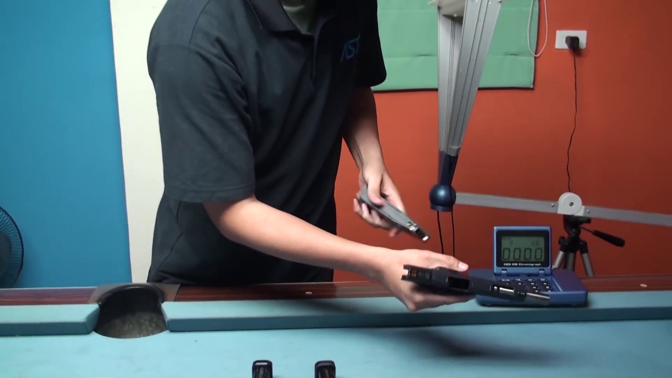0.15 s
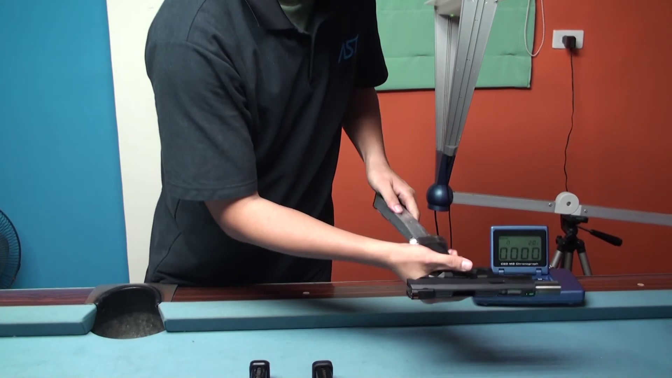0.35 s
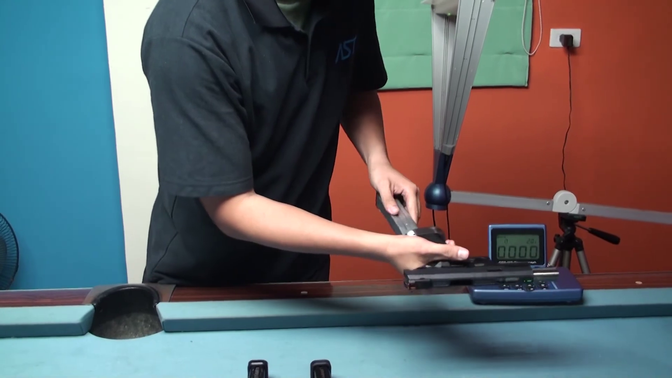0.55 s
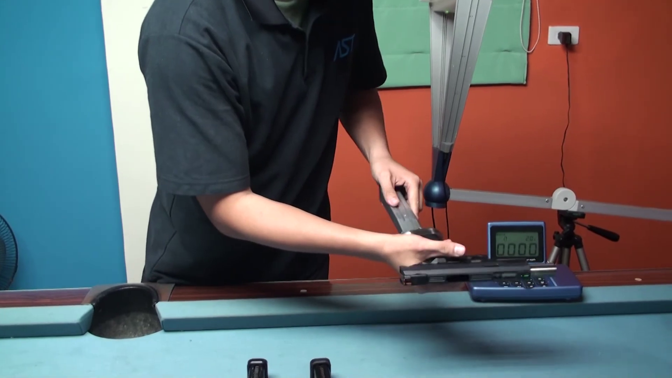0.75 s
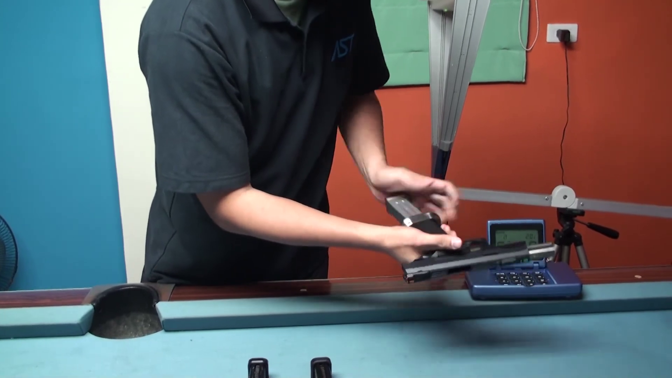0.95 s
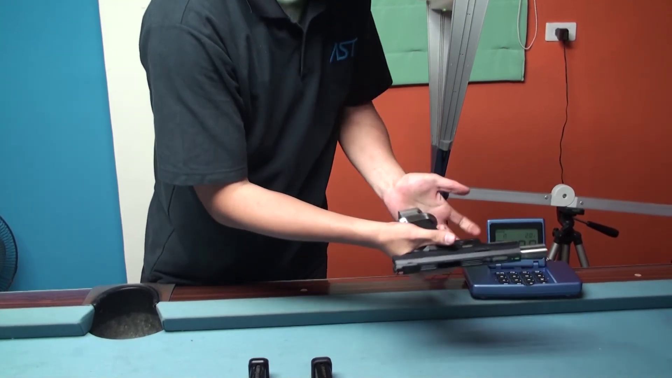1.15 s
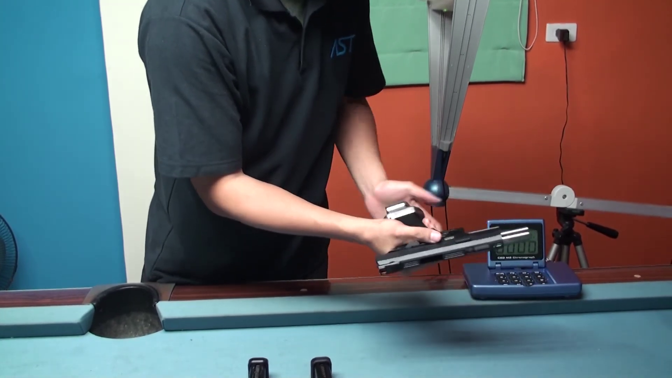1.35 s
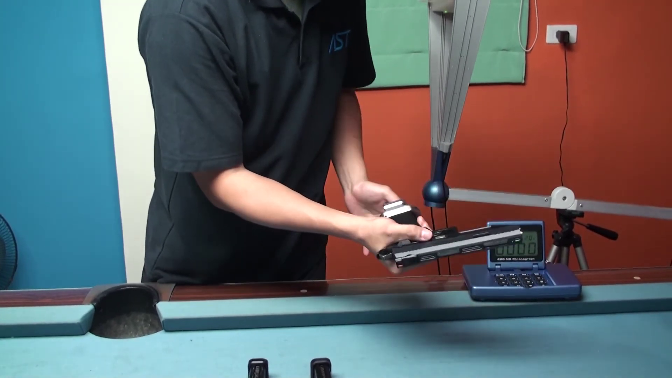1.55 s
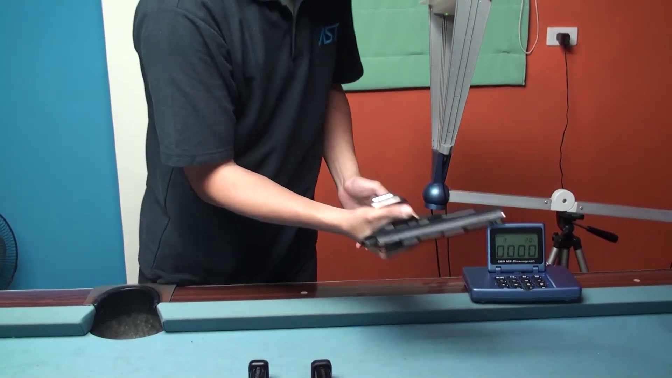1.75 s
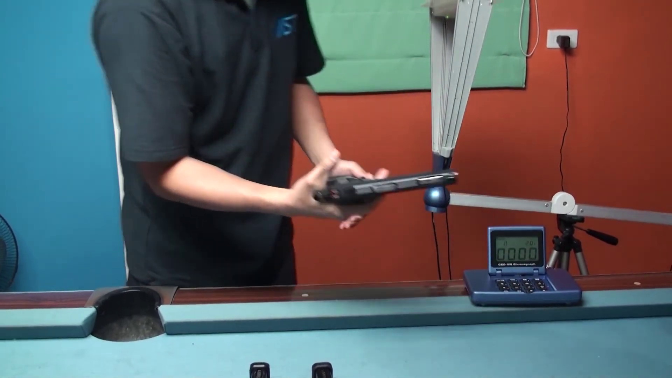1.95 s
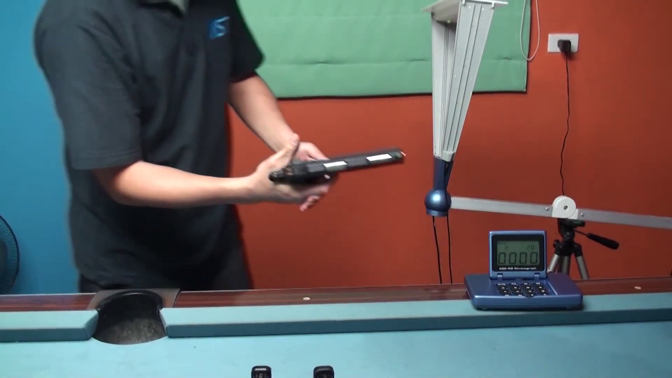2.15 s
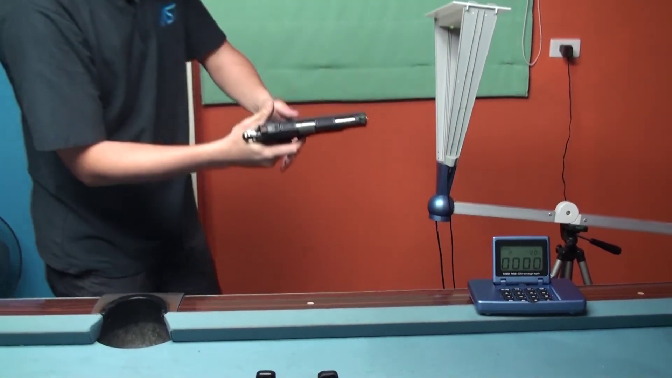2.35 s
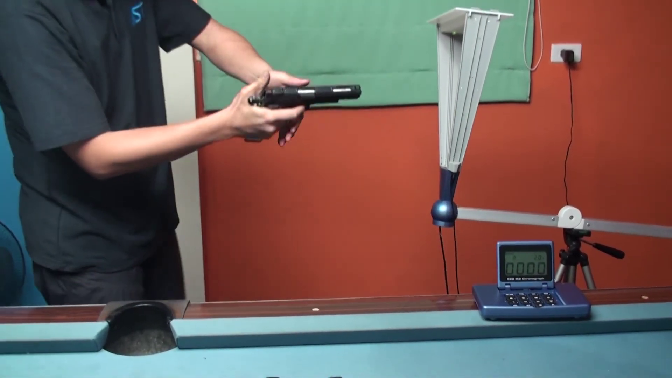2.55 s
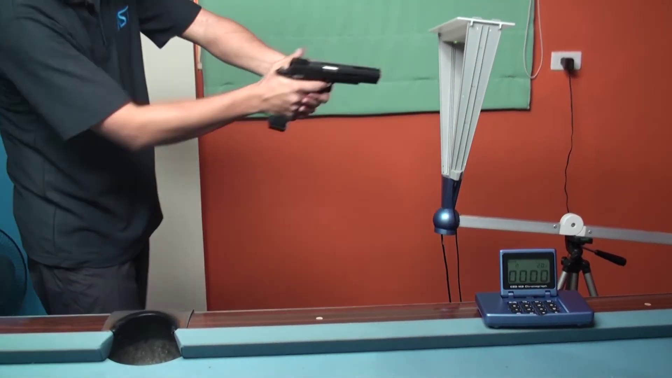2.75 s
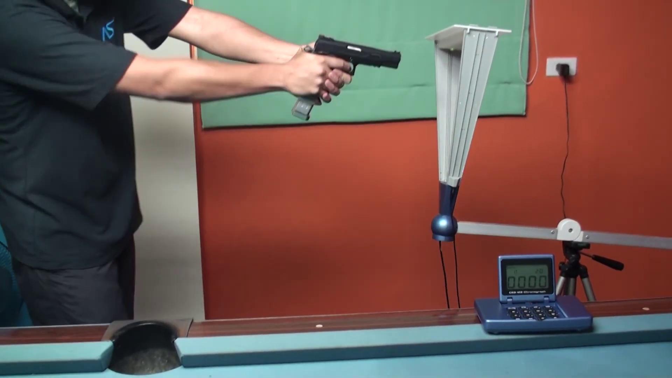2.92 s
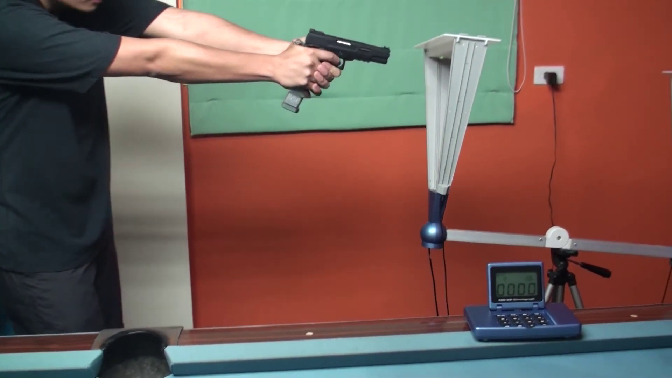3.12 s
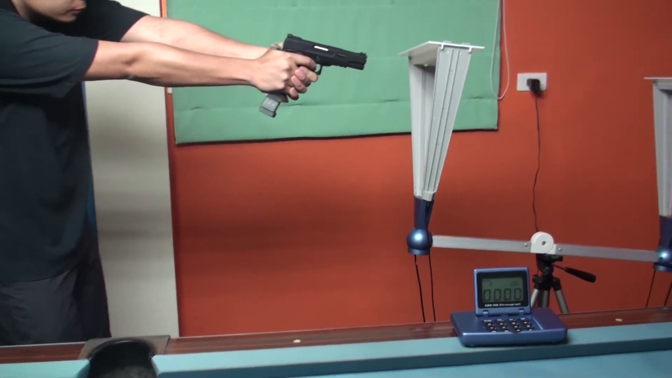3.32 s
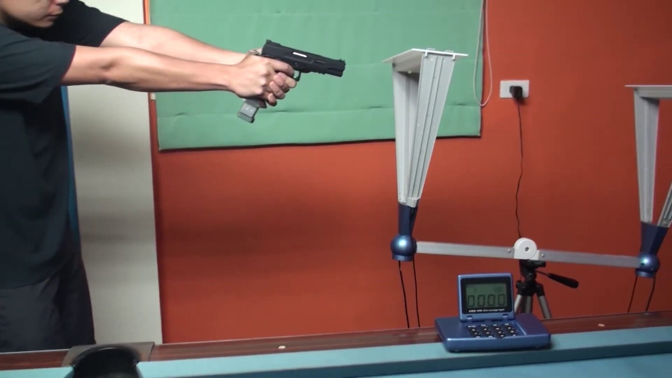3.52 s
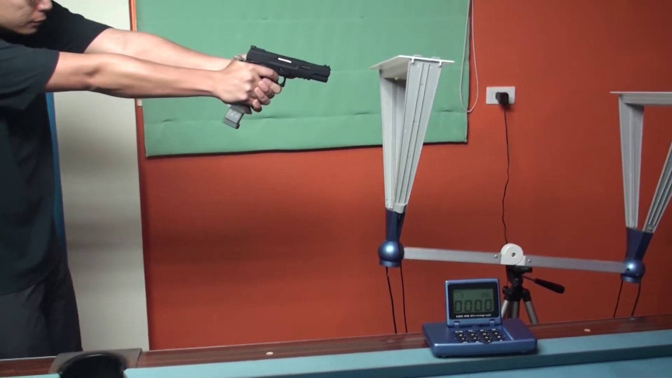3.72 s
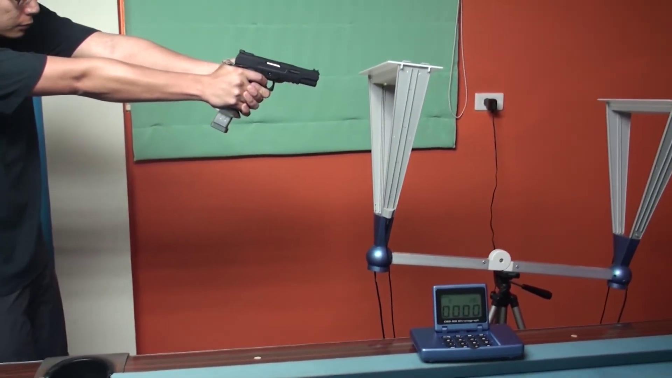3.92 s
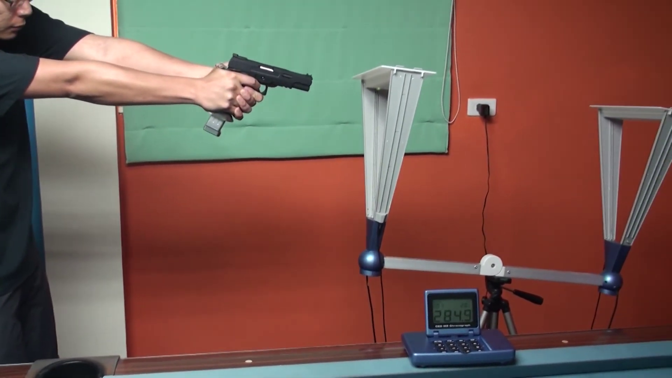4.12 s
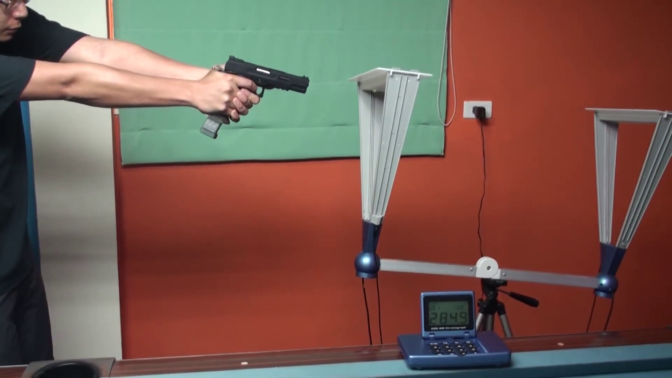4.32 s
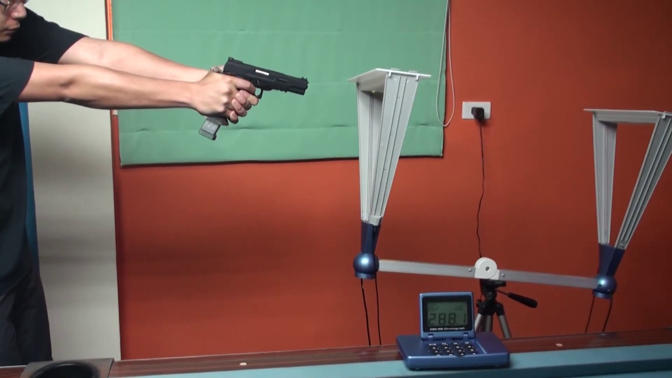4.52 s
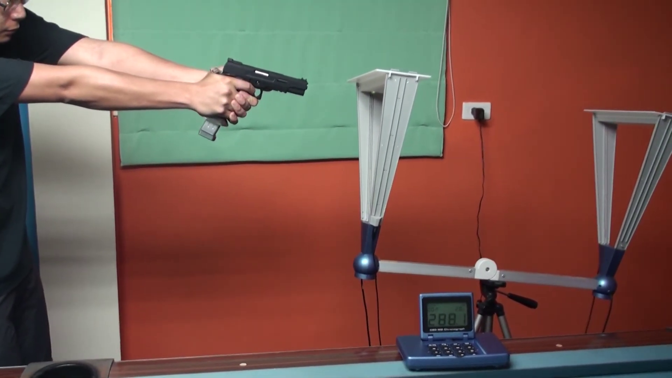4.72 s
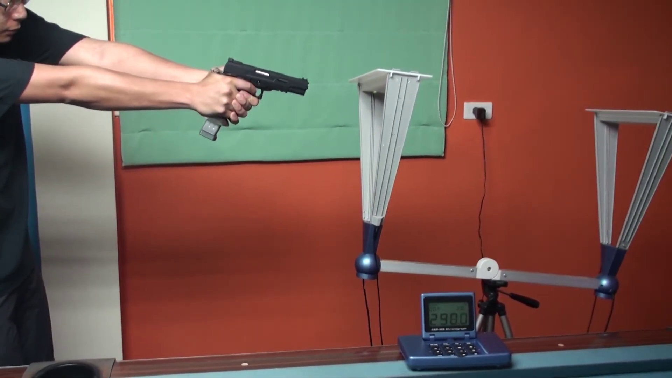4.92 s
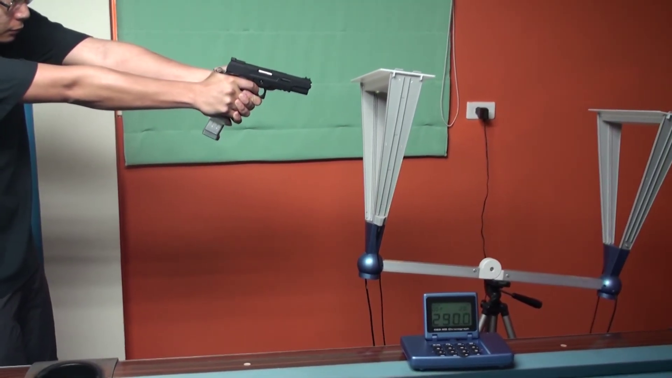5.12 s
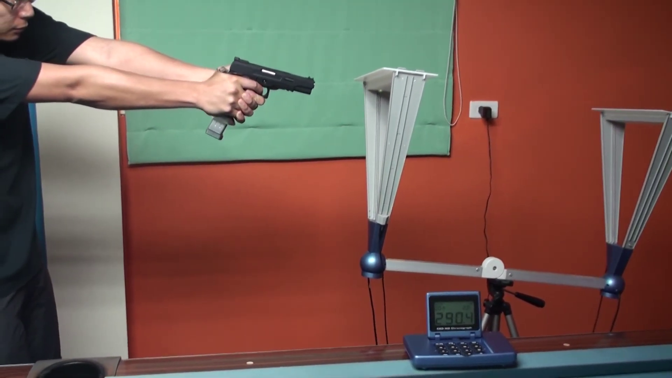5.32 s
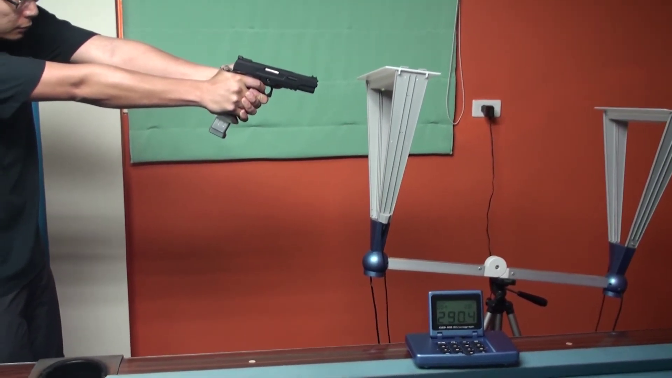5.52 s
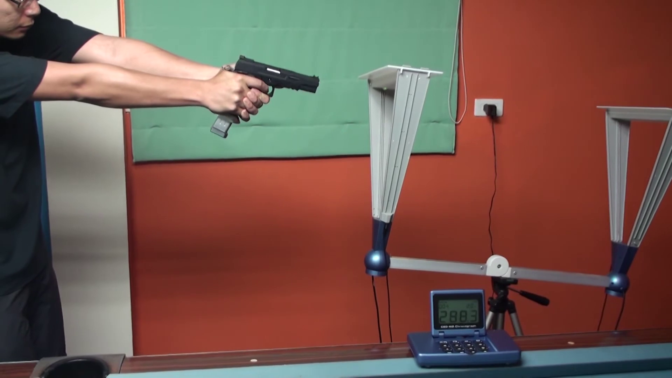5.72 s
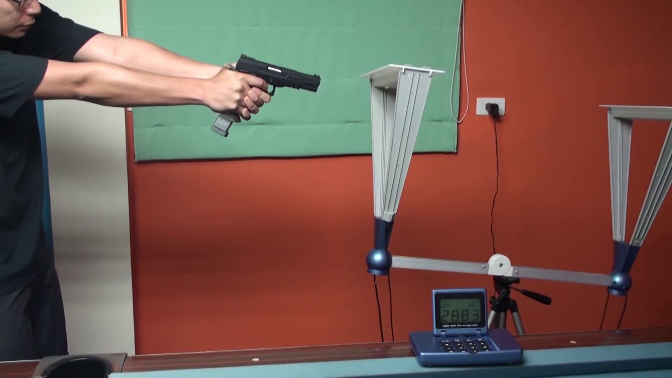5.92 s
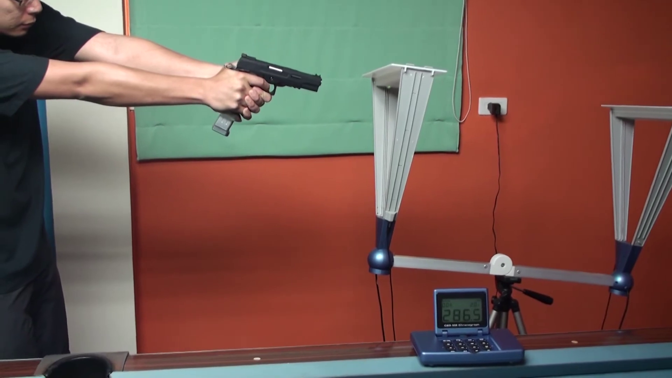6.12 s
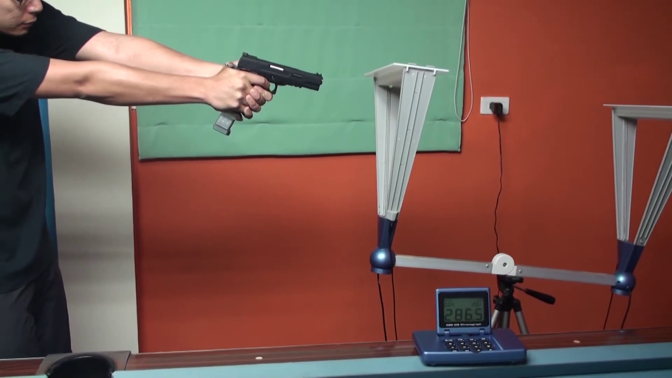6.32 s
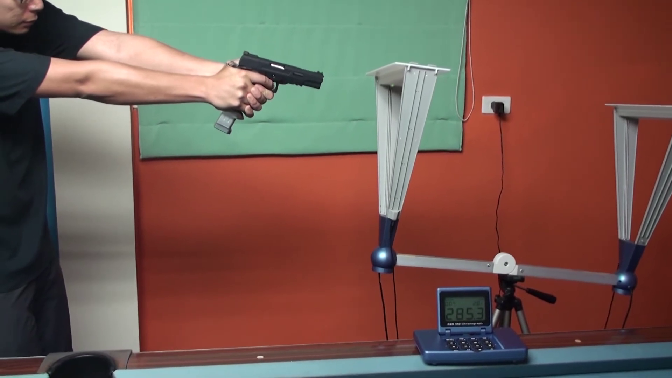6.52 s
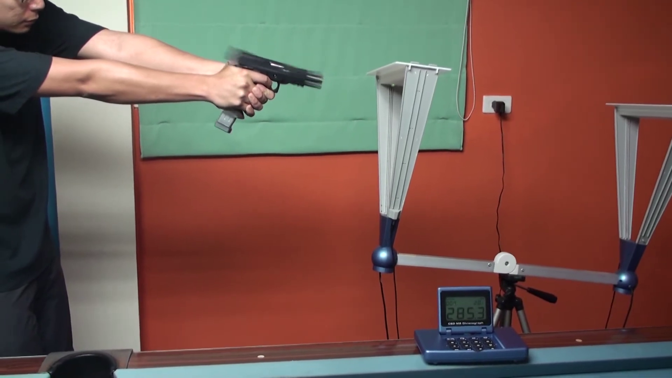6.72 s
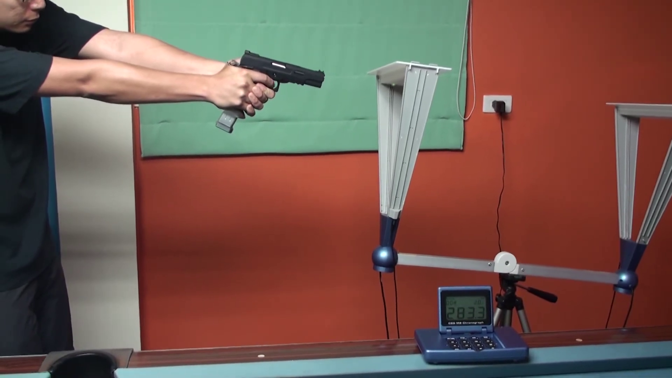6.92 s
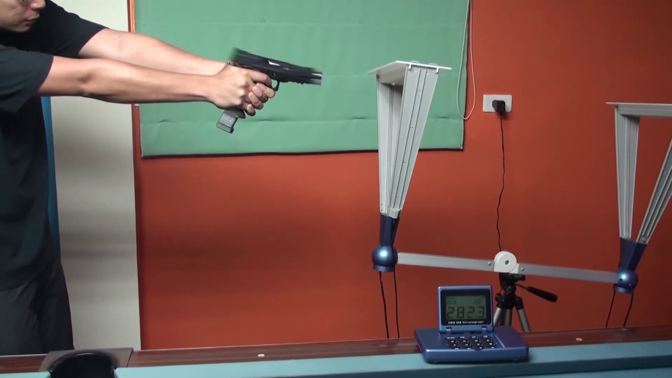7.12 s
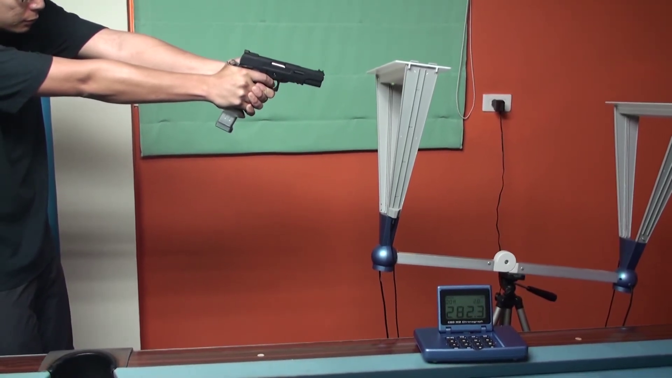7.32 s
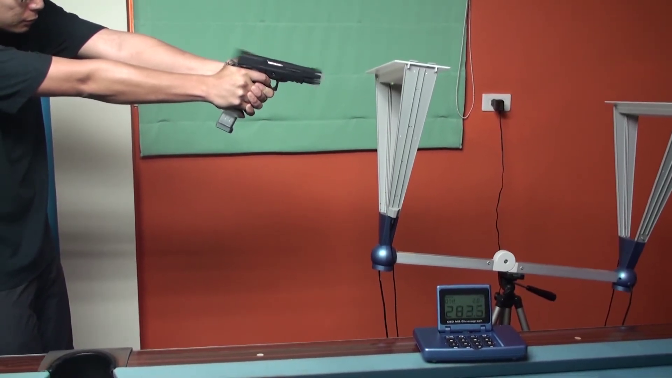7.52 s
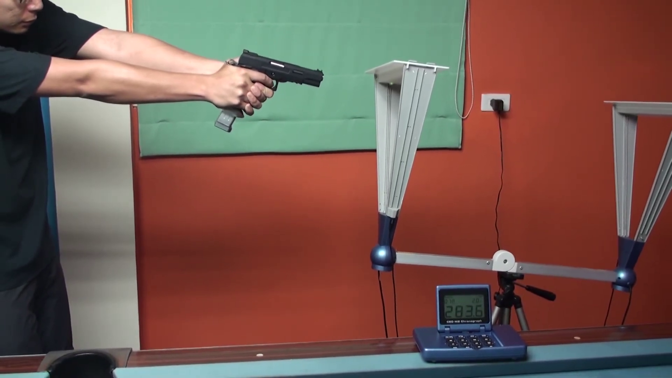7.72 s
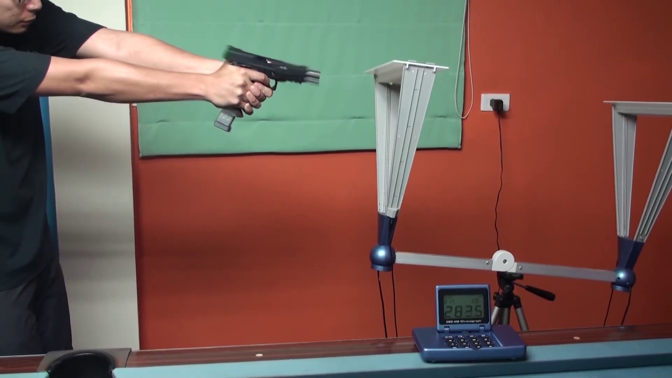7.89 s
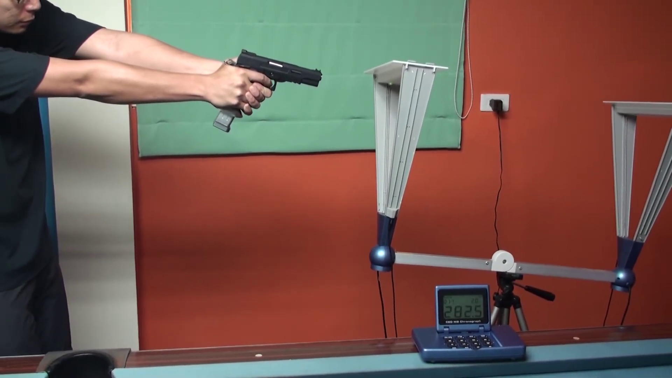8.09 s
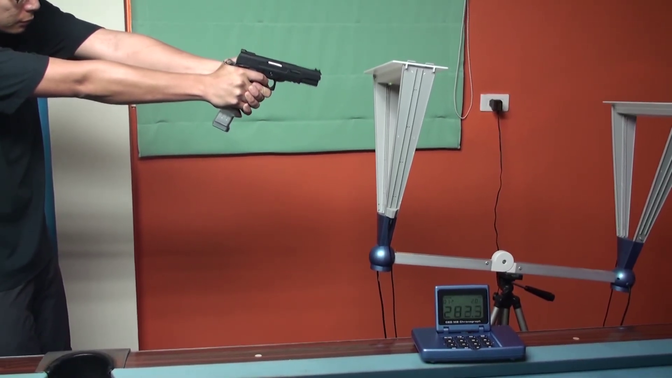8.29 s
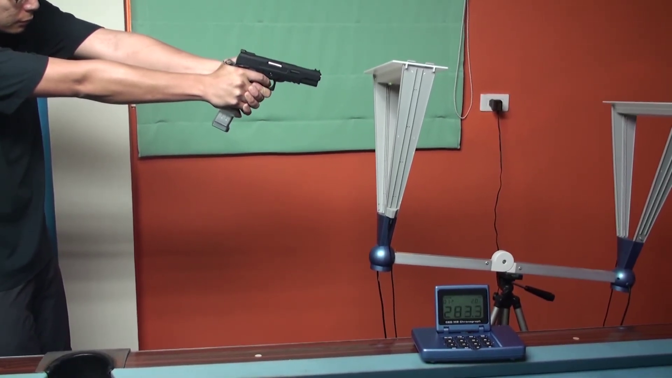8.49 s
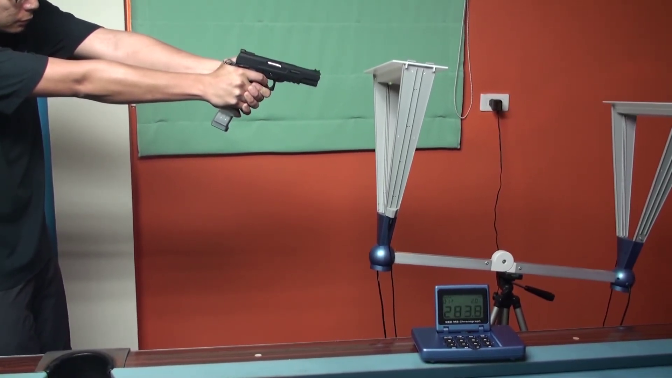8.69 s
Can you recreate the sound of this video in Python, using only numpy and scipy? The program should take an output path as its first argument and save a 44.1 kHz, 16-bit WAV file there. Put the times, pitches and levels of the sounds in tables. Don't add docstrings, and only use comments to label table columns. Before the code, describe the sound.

A low, uneven fan hum lies under a close stereo pickup in a hard-walled room. From 0.1 to 0.8 seconds come sparse, light plastic and metal ticks. Around 0.9 a cluster of taps and a gritty scrape lead to the magazine seating with a solid double clunk at 1.06. At 1.5 the slide releases and racks in quick, bright steel clacks that ring briefly. A small tap at 1.8 and soft cloth rustles around 2.2 to 3 follow, while a faint low motor tone swells at 2.6 and stops at 3.3. After near quiet, thirteen shots run from 4.05 to 8.67, roughly every 0.4 seconds: tiny hammer tick, sharp crack, gas puff, heavy slide blows and late clatter. Each is squashed into a loud, dense plateau, then a half-second room tail; from the third, a high valve whistle colours the hiss, and levels ease slightly.

```python
import sys
import numpy as np
from scipy import signal
from scipy.fft import rfft, irfft
from scipy.io import wavfile
from scipy.ndimage import uniform_filter1d

SR = 44100
rng = np.random.default_rng(int(sys.argv[2]) if len(sys.argv) > 2 else 0)


def unload_wav(signal):
    wavfile.write(
        sys.argv[1],
        SR,
        np.round(np.clip(np.atleast_2d(signal).T, -1, 1) * 32767).astype(np.int16),
    )


def convert_level_to_amplitude(level_db):
    exponent = np.asarray(level_db, float) / 20
    return 10 ** exponent


N = 385875

# frequency in Hz, density in dB per Hz.
AIR_COLOUR = [(12, -51.5), (20, -0.5), (68, -30), (104, -8), (187, -2.5), (216, -9), (285, 1), (337, -10),
              (410, -9), (624, -15), (923, -14), (1860, -23), (2260, -25), (3740, -31), (16000, -47)]
AIR_DB = -41.5
# frequency in Hz, level in dB.
FAN_LINES = [(118.4, -57.5), (156.1, -71)]
# frequency in Hz, correlation from -1 to 1.
AIR_LIKENESS = [(60, 0.6), (150, 0.82), (380, 1), (950, 0.51), (2380, 0.62), (5980, 0.33), (15000, 0.23)]
# frequency in Hz, level in dB.
AIR_LEFT_OVER_RIGHT = [(60, 15.5), (290, -5.5), (1400, 3), (6000, 5.5), (15000, 2)]
MOTOR_S, MOTOR_STOP_S, MOTOR_HZ, SAG_HZ_PER_S, MOTOR_DB = 2.61, 3.33, 189.5, 7.2, -42
SURGE_DB, SURGE_AT_S, SURGE_WIDTH_S = 6, 2.69, 0.049

# frequency in Hz, fall by 60 dB in seconds.
ROOM_T60 = [(60, 0.12), (150, 0.7), (500, 0.52), (2000, 0.51), (6000, 0.55), (12000, 0.45), (16000, 0.31)]

# start in seconds, swell in seconds, fall in seconds, top in dB; # a
# swell starts about 9 dB under the top, and the fall drops 20 dB.
STROKES = [(2.18, 0.025, 0.33, -49.5), (2.597, 0.12, 0.14, -44.5), (2.925, 0.011, 0.14, -55.5),
           (3.0, 0.11, 0.24, -61.5), (.94, .015, .05, -42), (1.035, .02, .01, -34), (1.005, .012, .02, -34),
           (1.9, 0.087, 0.24, -57)]
# frequency in Hz, density in dB per Hz.
CLOTH_COLOUR = [(1180, -53), (2000, -1), (3090, -1), (3870, -3.5), (6140, -2), (10700, -3), (14900, -15),
                (16000, -22)]
JERK = 2.2

# start in seconds, peak in dB, ring in Hz, ring fall by 60 dB in seconds,
# ring over the tick in dB.
TAPS = [(0.119, -23, 4140, 0.019, 5.5), (0.1344, -40, 4370, 0.022, 4), (0.2265, -34, 4040, 0.02, 1),
        (0.5254, -27, 3410, 0.014, 2), (0.808, -37, 3860, 0.025, -5), (0.9063, -18, 3870, 0.025, -2),
        (1.8397, -29, 3900, 0.02, -8), (2.9291, -37, 3450, 0.027, 2), (0.8634, -20, 2220, 0.028, 14),
        (0.8784, -30, 1310, 0.025, 5), (0.9433, -29, 1180, 0.025, 6), (0.9976, -22, 1100, 0.026, 2),
        (1.0234, -18.5, 2330, 0.049, -4), (0.2994, -49, 6900, 0.03, 8), (0.4544, -49, 6870, 0.03, 8),
        (0.5167, -20, 6420, 0.017, 1), (1.0171, -19, 8440, 0.022, 11), (0.1195, -34, 2000, 0.018, 12),
        (0.227, -42, 2000, .02, 12), (0.5245, -32, 2350, 0.024, 14), (0.865, -29, 1300, 0.044, 11)]
# frequency in Hz, density in dB per Hz.
TAP_COLOUR = [(290, -38), (500, -21), (631, -12), (1260, -5.5), (1690, -4), (3980, -4), (13100, -18.5),
              (16000, -53)]
SCRAPE_S, SEATED_S, SCRAPE_DB = 0.903, 1.058, -37.5
CATCH_DB, CATCH_S, DRAG_DB_PER_S = 4, 0.01, -38

# start in seconds, peak in dB, blow over that in dB, fall by 60 dB in seconds.
SEAT_BLOWS = [
    (1.057, 4, -3.5, 0.029),
    (1.077, -1.5, 8.5, 0.067),
]
# start in seconds, peak in dB, blow over that in dB, fall by 60 dB in seconds.
RACK_BLOWS = [
    (1.5221, 0, 7.4, 0.025),
    (1.549, 0, 1.7, 0.06),
]
# start in seconds, peak in dB, blow over that in dB,
# fall by 60 dB in seconds.
STOP_BLOWS = [
    (1.490, -6.5, -12.5, 0.13),
    (1.5027, 2, 6, 0.025),
]
# start in seconds, peak in dB, blow over that in dB,
# fall by 60 dB in seconds.
SEAR_TICKS = [
    (4.0464, -3, 5, 0.0093),
    (4.4136, -6, 6, 0.0077),
]
# frequency in Hz, density in dB per Hz.
SEAT_COLOUR = [(180, -37), (300, -25), (398, -44), (915, -13), (1010, -17), (2930, -5), (6740, -5),
               (8090, -3.5), (11300, -8), (16000, -25)]
# frequency in Hz, density in dB per Hz.
RACK_COLOUR = [(180, -70), (300, -42), (511, -22), (870, -17.5), (1970, -12.5), (2360, -3), (2790, -8),
               (5800, -1.5), (11500, -3), (16000, -24)]
# frequency in Hz, level in dB, fall by 60 dB in seconds.
SLIDE_MODES = [(2334, -14, 0.051), (2420, -13.5, .08), (2490, -12, 0.071), (2580, -13.5, 0.037),
               (8450, -23, .01)]
# frequency in Hz, level in dB, fall by 60 dB in seconds.
STOP_MODES = [(2080, -12.5, 0.033), (3410, -13, 0.025), (4500, -17, 0.035)]

# start in seconds, gas charge in dB, hammer under that in dB, hammer lead in seconds.
SHOTS = [(4.0513, 14.5, -36, 0.0076), (4.419, 14.5, -47, 0.01), (4.817, 13, -31, 0.007),
         (5.2029, 13.5, -28, 0.0049), (5.5885, 11.5, -22, 0.0058), (5.9932, 11.5, -28, 0.0065),
         (6.3931, 11, -23.5, 0.0077), (6.759, 10, -26, 0.0063), (7.1353, 11.5, -25, 0.0075),
         (7.5262, 10, -23, 0.0044), (7.9112, 10, -26, 0.006), (8.2777, 9, -26, 0.0064),
         (8.6721, 10, -24, 0.0051)]
# delay in seconds, level in dB, fall by 60 dB in seconds.
GAS_PARTS = [
    (.0005, -7, 0.0028),
    (.0012, -4, 0.015),
    (.005, -7, 0.088),
    (.010, -9, 0.015),
]
# delay in seconds, level in dB, fall by 60 dB in seconds.
STEEL_PARTS = [
    (.017, -11, 0.06),
    (.05, -4, 0.026),
    (.07, -12, 0.012),
    (.115, -11.5, 0.019),
]
# frequency in Hz, density in dB per Hz.
GAS_COLOUR = [(59, -60), (100, -12), (784, -7), (2130, -10.5), (6150, -8), (6700, -4), (8460, -8),
              (10700, -5.5), (16000, -28)]
# frequency in Hz, density in dB per Hz.
BLOW_COLOUR = [(29, -41), (50, -58.5), (138, 3.5), (180, -7), (306, 3.5), (472, -5.5), (678, 3.5), (997, 1),
               (1070, 0.5), (1300, -4), (2490, -6.5), (6710, -2.5), (12900, -4), (16000, -12)]
# frequency in Hz, level in dB, fall by 60 dB in seconds.
FRAME_MODES = [(682, -11.5, 0.016), (450, -23.5, 0.0037)]
# frequency in Hz, density in dB per Hz.
WHISTLE_COLOUR = [(4500, -31), (5900, -11), (6700, -4), (7600, -7.5), (9500, -41)]
COLD_S, WHISTLE_DB, WHISTLE_FADE_DB_PER_S, WARM_DB = 4.6, -1.5, -0.4, -31

# frequency in Hz, gain in dB.
LEFT_RESPONSE = [(60, 0), (150, -17.5), (380, -8), (950, -6), (2400, -5), (6000, -5.5), (8500, -6.5),
                 (10500, -3)]
# frequency in Hz, gain in dB.
RIGHT_RESPONSE = [(8000, 1), (10500, -2.5), (11600, 2.5), (13000, 5), (15500, 7)]
LOW_CUT_HZ, EDGE_HZ, LEFT_EDGE_HZ = 92, 15900, 11650


def evened(x):
    return x / np.sqrt(np.mean(x ** 2) + 1e-20)


def read(points, hz):
    f, value = np.transpose(points)
    return np.interp(np.log(hz + 1), np.log(f + 1), value)


def add(mix, s, sound):
    part = mix[:, round(s * SR):][:, :sound.shape[1]]
    part += sound[:, :part.shape[1]]


def gate(start, stop, edge):
    t = np.arange(N) / SR
    return np.clip(np.minimum(t - start, stop - t) / edge, 0, 1)


def swing(rate):
    t = np.arange(N) / SR
    rates = np.geomspace(rate / 20, rate, 16)
    return evened(sum(np.sin(2 * np.pi * (f * t + rng.random())) / np.sqrt(f) for f in rates))


def coloured(x, points, modes=()):
    gain_db = np.maximum(read(points, abs(np.fft.fftfreq(4096, 1 / SR))), -90)
    log_gain = gain_db * np.log(10) / 20
    taps = np.fft.ifft(np.exp(np.conj(signal.hilbert(log_gain)))).real
    taps = np.r_[taps / np.linalg.norm(taps), np.zeros(4096)]
    t = np.arange(8192) / SR
    for hz, db, t60 in modes:
        ring = np.sin(2 * np.pi * hz * t) * convert_level_to_amplitude(-60 * t / t60)
        taps = taps + convert_level_to_amplitude(db) * ring / np.linalg.norm(ring)
    return signal.oaconvolve(x, taps[None], axes=1)[:, :N]


def burst(db, t60, rise=0.00029, colour=0.42):
    t = np.arange(4000) / SR
    noise = rng.standard_normal(4000)
    direct = convert_level_to_amplitude(db - 60 * t / max(t60, 0.002)) * np.minimum(t / rise, 1) * noise
    click = (t == 0) + colour * noise * convert_level_to_amplitude(-60 * t / 0.003) / 3
    sent = np.linalg.norm(direct) * click / np.linalg.norm(click)
    return np.array([direct, sent])


def motor():
    t = np.arange(N) / SR
    surge_db = SURGE_DB * np.exp(-((t - SURGE_AT_S) / SURGE_WIDTH_S) ** 2)
    level = gate(MOTOR_S, MOTOR_STOP_S, 0.02) * convert_level_to_amplitude(MOTOR_DB + surge_db)
    return level * np.sin(2 * np.pi * np.cumsum(MOTOR_HZ - SAG_HZ_PER_S * (t - MOTOR_S)) / SR)


def air():
    frames, hz = N // 512 + 5, np.fft.rfftfreq(2048, 1 / SR)
    a, b, c, d, patches = rng.standard_normal((frames, 1025, 5)).T
    patches = evened(uniform_filter1d(uniform_filter1d(patches, 14, 0), 8, 1))
    same = np.clip(read(AIR_LIKENESS, hz), -1, 1)[:, None]
    right = a + 1j * b
    left = same * right + np.sqrt(1 - same ** 2) * (c + 1j * d)
    left = convert_level_to_amplitude(read(AIR_LEFT_OVER_RIGHT, hz))[:, None] * left
    spectra = np.array([left, right]) * convert_level_to_amplitude(read(AIR_COLOUR, hz)[:, None] + 0.59 * patches)
    floor = signal.istft(spectra, nperseg=2048, noverlap=1536)[1][:, :N]
    wash = convert_level_to_amplitude(AIR_DB + 5.5) * evened(floor)
    lines = motor()
    for line_hz, db in FAN_LINES:
        level = convert_level_to_amplitude(db + 2 * swing(8.5))
        lines = lines + level * np.sin(2 * np.pi * np.cumsum(line_hz + 2 * swing(7.9)) / SR)
    return wash + lines * convert_level_to_amplitude(np.array([[-4.], [0]]))


def room(x, shared=0.39):
    taps = np.zeros((3, SR))
    at = np.arange(90, SR - 10, 10) + rng.integers(0, 10, (3, (SR - 91) // 10))
    np.put_along_axis(taps, at, rng.choice([-1., 1.], at.shape), 1)
    taps = taps * convert_level_to_amplitude(3.44 * np.minimum(rng.exponential(1, taps.shape), 5))
    shared = np.clip(shared, 0, 1)
    taps = np.sqrt(shared) * taps[2] + np.sqrt(1 - shared) * taps[:2]
    hz, t, z = signal.stft(taps, SR, nperseg=256)
    decay = convert_level_to_amplitude(-60 * t / read(ROOM_T60, hz)[:, None])
    tail = signal.istft(z * decay, SR, nperseg=256)[1][:, :SR * 2 // 3]
    return signal.fftconvolve(x[None], tail / np.linalg.norm(tail[0]), axes=1)[:, :N]


def cloth():
    grains = convert_level_to_amplitude(2.6 * rng.exponential(1, N)) * rng.standard_normal(N)
    t = np.arange(N) / SR
    strokes = np.zeros(N)
    for s, swell, fall, db in STROKES:
        top_s = s + swell
        drop = np.maximum((top_s - t) / (JERK * swell), (t - top_s) / fall)
        strokes += gate(s, N, 0.0061) * convert_level_to_amplitude(db - 20 * drop)
    return strokes * coloured(evened(grains)[None], CLOTH_COLOUR)


def scrape():
    t = np.maximum(np.arange(N) / SR - SCRAPE_S, 0)
    level_db = SCRAPE_DB + CATCH_DB * np.exp(-t / CATCH_S) + DRAG_DB_PER_S * t
    return gate(SCRAPE_S, SEATED_S, 0.0032) * convert_level_to_amplitude(level_db)


def handling():
    ticks, rings = np.zeros((2, 2, N))
    t = np.arange(2000) / SR
    for s, peak_db, hz, t60, ring_db in TAPS:
        add(ticks, s, burst(peak_db - 3 - ring_db / 2, t60, rise=0.00062))
        ring = sum(np.sin(2 * np.pi * hz * detune * t) for detune in (0.975, 1, 1.03))
        ring = ring * np.minimum(t / 0.0011, 1)
        fall_db = np.array([[60.], [150.]]) * t / max(t60, 0.002)
        add(rings, s, convert_level_to_amplitude(peak_db - 7.5 + ring_db / 2 - fall_db) * ring)
    heights = convert_level_to_amplitude(3.5 * np.minimum(rng.exponential(1, N), 3))
    grit = heights * (rng.random(N) < 5000 / SR) * rng.choice([-1, 1], N)
    shield = convert_level_to_amplitude(np.array([[0], [-5.]]))
    near = rings * shield + coloured(ticks + scrape() * evened(grit), TAP_COLOUR)
    return near * shield


def steel(blows, colour, modes=()):
    x = np.zeros((2, N))
    for s, peak_db, blow_db, t60 in blows:
        add(x, s, burst(peak_db + blow_db - 11, t60))
    return coloured(x, colour, modes)


def pistol():
    gas, slide, whistle, hammer = np.zeros((4, 2, N))
    for s, charge_db, hammer_db, lead in SHOTS:
        whistle_db = WHISTLE_DB + WHISTLE_FADE_DB_PER_S * (s - COLD_S) + WARM_DB * (s < COLD_S)
        for mix, parts in ((gas, GAS_PARTS), (slide, STEEL_PARTS)):
            for delay, db, t60 in parts:
                part_s = s + delay * rng.uniform(0.9, 1.1)
                add(mix, part_s, burst(charge_db + db + rng.normal(0, 1.6), t60))
        add(whistle, s + 0.001015, burst(charge_db + whistle_db, 0.012))
        add(hammer, s - lead, burst(charge_db + hammer_db, 0.054, rise=0.0021))
    shots = coloured(gas, GAS_COLOUR) + coloured(slide, BLOW_COLOUR, FRAME_MODES)
    return shots + coloured(whistle, WHISTLE_COLOUR) + coloured(hammer, SEAT_COLOUR)


def scene():
    near = pistol() + handling() + cloth()
    near = near + steel(SEAT_BLOWS + SEAR_TICKS, SEAT_COLOUR)
    near = near + steel(RACK_BLOWS, RACK_COLOUR, SLIDE_MODES)
    near = near + steel(STOP_BLOWS, RACK_COLOUR, STOP_MODES)
    direct, sent = near
    turn = 2 * np.pi * np.arange(N) / SR / 0.29
    tail = sum(room(sent * np.sqrt(2 / 3) * np.cos(turn + k * np.pi / 3)) for k in range(3))
    return direct + convert_level_to_amplitude(3.0) * tail + air()


def roll_off(x):
    return signal.sosfilt(signal.butter(12, 16470, fs=SR, output="sos"), x)


def record(dry):
    hz = np.fft.rfftfreq(N + SR, 1 / SR)
    response = np.array([convert_level_to_amplitude(read(LEFT_RESPONSE, hz)), convert_level_to_amplitude(read(RIGHT_RESPONSE, hz))])
    x = irfft(rfft(dry, N + SR) * response, N + SR)[:, :N]

    busy = (uniform_filter1d(x[1] ** 2, 400) > convert_level_to_amplitude(-36)) * 1.
    keep = np.exp(-1 / (1.5 * SR))
    rider = convert_level_to_amplitude(-14 * signal.lfilter([1 - keep], [1, -keep], busy))
    x = x * rider

    loudest = uniform_filter1d((x ** 2).max(0), size=130, origin=25)
    power_db = 10 * np.log10(abs(loudest) + 1e-12)
    fall = np.arange(N) * 444.0 / SR
    over_db = np.maximum(np.maximum.accumulate(power_db + fall) - fall + 11.5, 0)
    x = x / convert_level_to_amplitude(uniform_filter1d(over_db, size=24))
    x = signal.sosfilt(signal.butter(6, LOW_CUT_HZ, "high", fs=SR, output="sos"), x)

    low_pass = signal.firwin(255, LEFT_EDGE_HZ, window=("kaiser", 7), fs=SR)
    top = x[0] - signal.oaconvolve(x[0], low_pass, "same")
    power = uniform_filter1d(x[1] ** 2, size=600) + 1e-9
    attack = power > 6. * np.roll(power, 2400)
    kept = convert_level_to_amplitude(-7) * uniform_filter1d(attack * 1., size=200)
    x = np.array([x[0] - top * (1 - kept), x[1]])

    clamp = uniform_filter1d(np.maximum(over_db - np.roll(over_db, 300) - 3.5, 0), size=160)
    jolt = (clamp - uniform_filter1d(clamp, size=3000)) * convert_level_to_amplitude(np.array([[-4.], [0]]))
    band = signal.butter(2, [15, 40], "band", fs=SR, output="sos")
    rumble = signal.sosfilt(band, rng.standard_normal((2, N)))
    flicker = rider * evened(0.3 * rumble[0] + 0.7 * rumble)
    x = x + convert_level_to_amplitude(-59.5) * np.roll(jolt, 400, axis=1) + convert_level_to_amplitude(-66.5) * flicker

    edge = signal.firwin(511, EDGE_HZ, window=("kaiser", 9), fs=SR)
    x = signal.oaconvolve(x, edge[None], "same")
    mix = np.clip(x, -1, 1)
    return roll_off(mix)


dry = scene()
out = record(dry)
unload_wav(out)
```